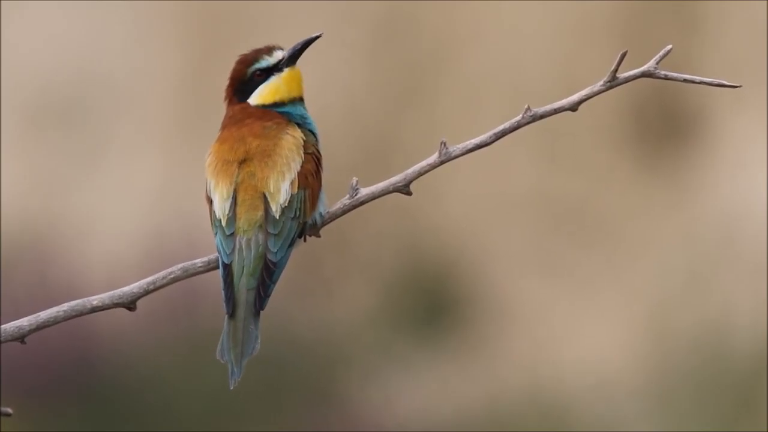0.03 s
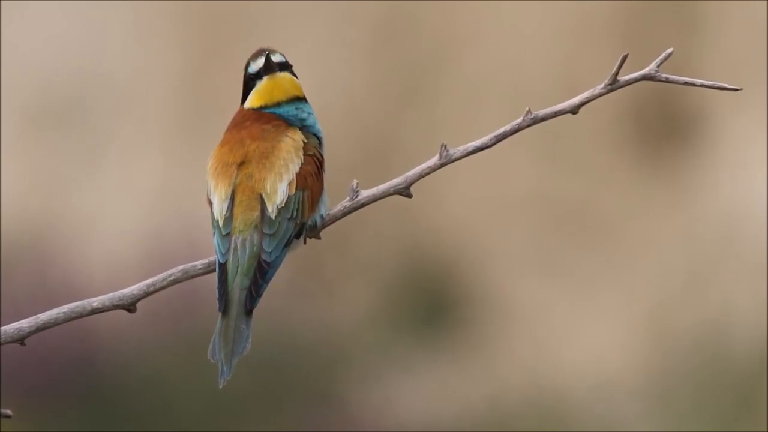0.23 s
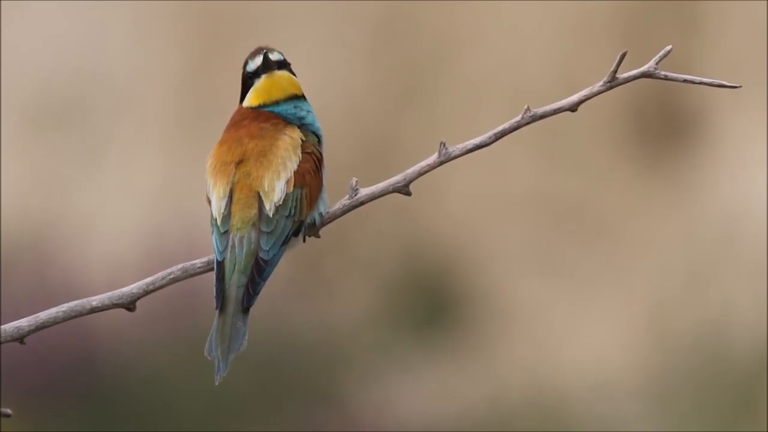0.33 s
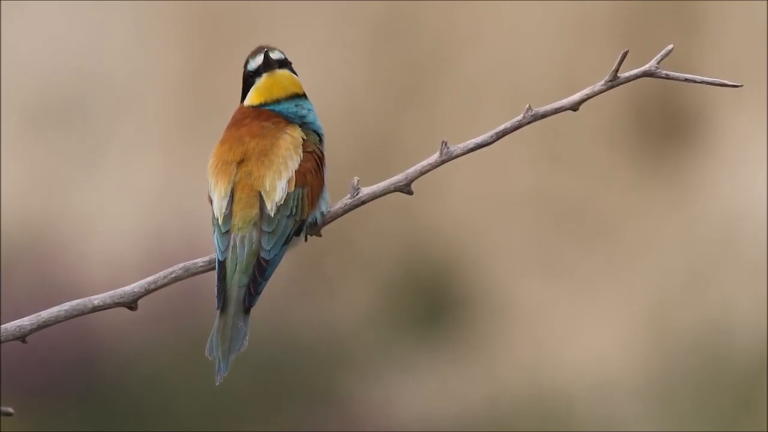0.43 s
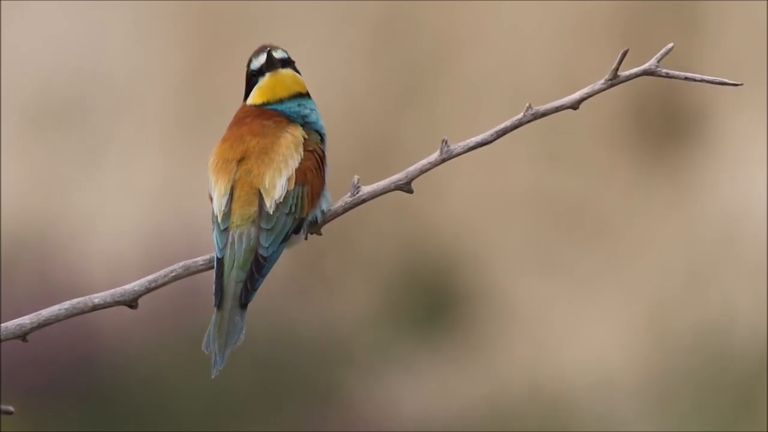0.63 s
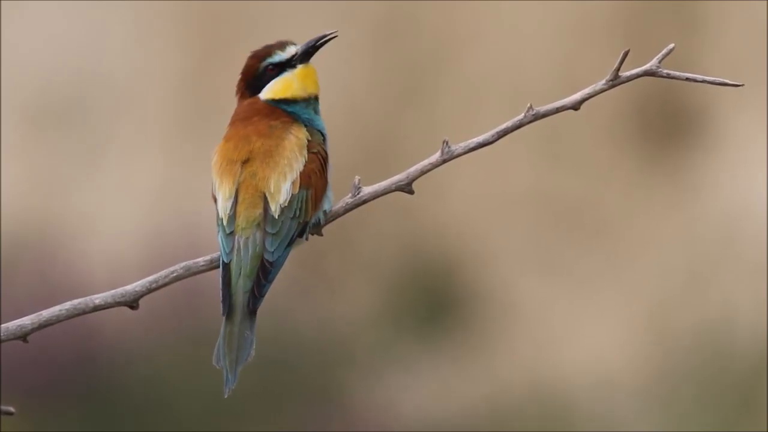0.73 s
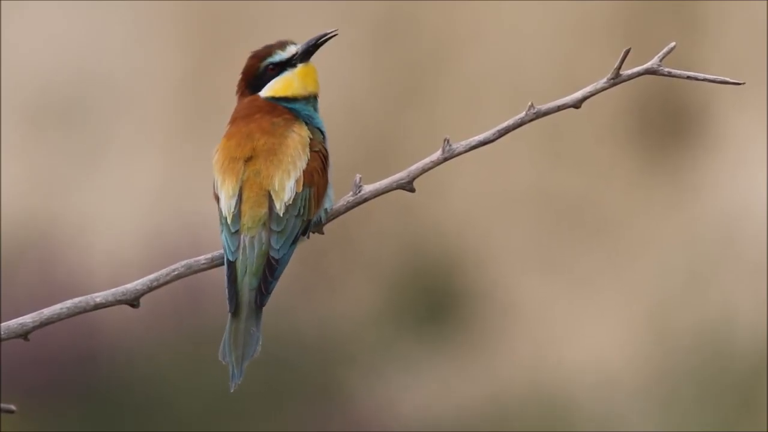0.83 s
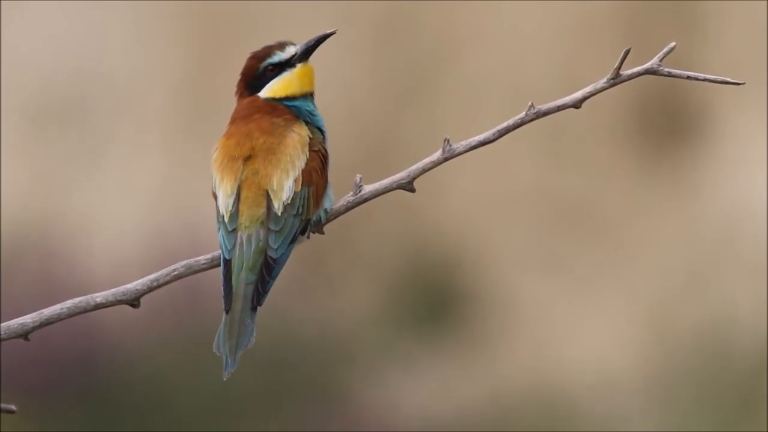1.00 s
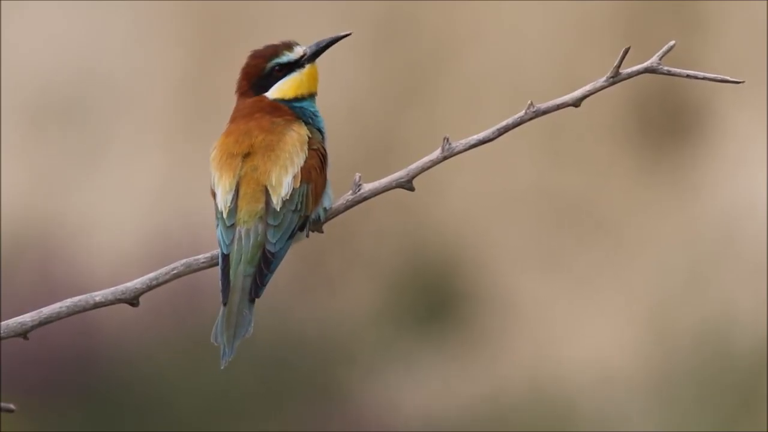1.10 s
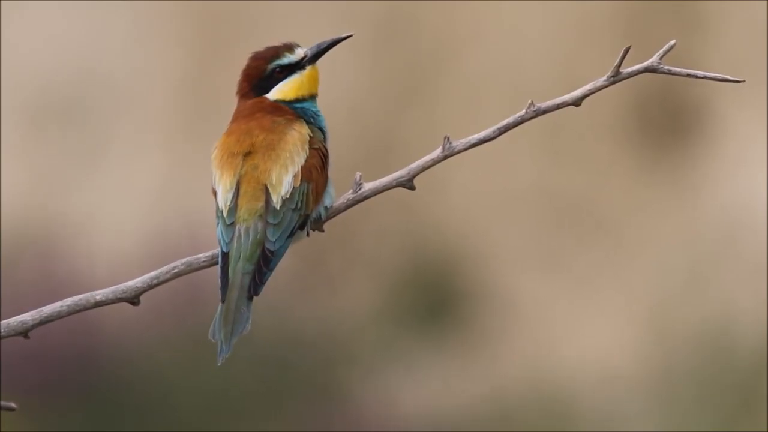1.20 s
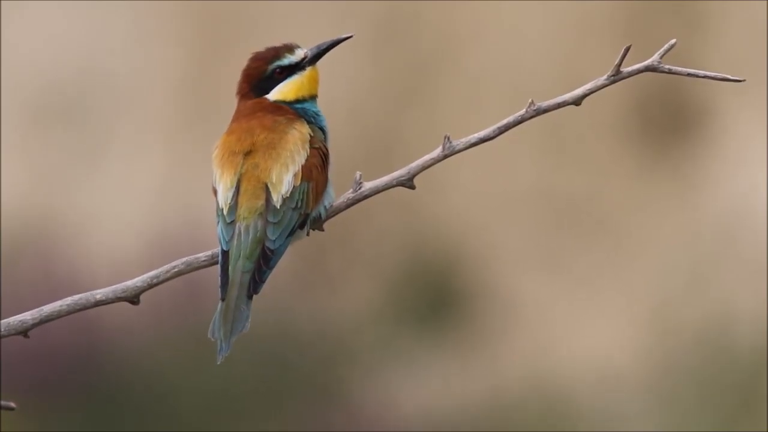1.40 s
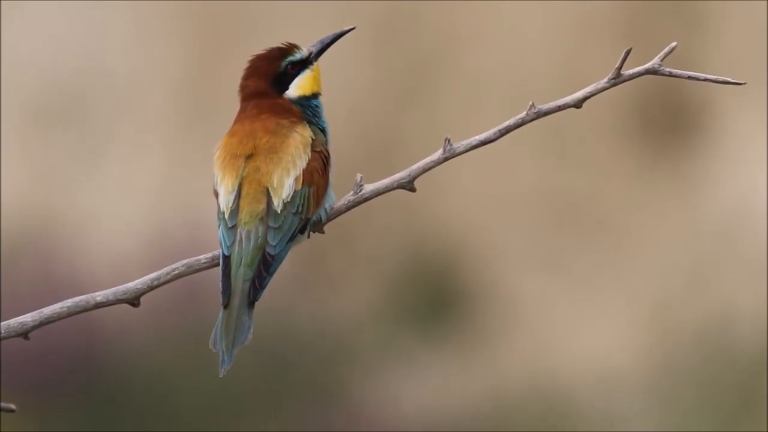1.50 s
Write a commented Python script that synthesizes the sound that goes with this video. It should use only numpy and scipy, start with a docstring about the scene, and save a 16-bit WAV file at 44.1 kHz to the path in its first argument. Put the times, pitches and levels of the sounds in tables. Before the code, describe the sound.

Outdoors, a bird close to the microphone whistles one long rising and falling note. Distant birds chirp and twitter around it, then come soft wing flaps and a faint hoarse falling call, above a low distant drone.

```python
"""One long whistle in open air

Outdoors, the bird nearest the microphone gives a clear whistle, an almost pure tone that climbs
an octave, frays at the top and sinks back. Farther off, with more echo from ground and bushes,
others yelp, twitter and chirp in short bending tones, and one gives a hoarse falling hiss.
A few soft flaps and faint ticks pass over a low distant drone and the hush of open air."""
import sys
import numpy as np
from scipy import signal
from scipy.fft import rfft, irfft, next_fast_len
from scipy.io import wavfile
from scipy.ndimage import uniform_filter1d, map_coordinates

SR = 44100
rng = np.random.default_rng(int(sys.argv[2]) if len(sys.argv) > 2 else 0)


def file_out(sig):
    """Save sig as 16-bit WAV at sys.argv[1]."""
    # one column per channel
    cols = np.atleast_2d(sig).T
    # limit, then scale
    lim = np.clip(cols, -1, 1)
    pcm = np.round(lim * 32767).astype(np.int16)
    wavfile.write(sys.argv[1], SR, pcm)


N = 68355

# colour of the open air: frequency_hz, gain_db
AIR_COLOUR = [(25, -22.5), (60, -4.5), (150, -6.5), (250, 5.5), (420, 9.5), (520, 2), (700, 3), (1200, 1),
              (1700, -5), (3300, 1), (4200, -7), (4900, -26), (8000, -50), (15500, -30)]
# its rise and fall: time_s, level_db
AIR_LEVEL = [(0, -48.5), (.15, -50.5), (.35, -51), (.53, -48), (.65, -49), (.85, -45), (1.02, -48.5),
             (1.25, -50.5), (1.55, -49.5)]
# colour of the thin hiss above it: frequency_hz, gain_db
HISS_COLOUR = [(1500, -50), (4500, 8), (5200, -2), (6500, 2.5), (8000, -1), (10000, -5), (12000, -7),
               (15500, -11.5)]
# its rise and fall: time_s, level_db
HISS_LEVEL = [(0, -58.5), (.15, -62), (.3, -58), (.44, -57), (.56, -57), (.7, -61), (1.05, -59.5),
              (1.35, -59), (1.55, -63)]
# bands of the distant drone: pitch_hz, nominal_width_hz, level_db
DRONE_BANDS = [(377.2, 42, -49), (596, 56, -59), (781, 40, -63), (1088, 100, -59)]
# their shared swell: time_s, gain_db
DRONE_SWELL = [(0, 3.5), (.1, -1.5), (.25, 2.5), (.45, 2), (.65, 0), (.76, 4), (.86, -6.5), (1.02, -0.5),
               (1.2, -1.5), (1.3, -11.5), (1.46, 2.5), (1.55, -2.5)]
# a far bird's yelps, one curve each: time_s, pitch_hz, level_db
YELP_CURVES = [
    [(0, 2140, -37), (.012, 2048, -44), (.026, 1884, -43.5), (.051, 1852, -43.5), (.06, 1400, -51),
     (.069, 1210, -66)],
    [(.82, 1350, -61), (.832, 1688, -43), (.842, 1985, -49), (.867, 2048, -38.5), (.885, 1859, -52),
     (.905, 1998, -40.5), (.927, 2214, -29.5), (.94, 2165, -29.5), (.955, 2001, -44.5), (.972, 1837, -41),
     (.983, 1512, -50), (.995, 1140, -50)],
]
# their overtones: multiple, gain_db
YELP_HARMONICS = [(2, -15.5), (3, -26), (4, -37), (6, -33)]
# overtone lift, one per yelp: gain_db
YELP_BRIGHTNESS = [4.5, -2.5]
# far runs of twittering: start_s, length_s, pitch_hz, level_db, scatter_fraction
TWITTER_RUNS = [(.005, .18, 4820, -55, 0.037), (0.379, .1, 4950, -48.5, .05),
                (1.112, .16, 4966, -49, 0.029), (1.299, .16, 4760, -57, .045)]
# the near bird's whistle: time_s, pitch_hz
WHISTLE_PITCH = [(.18, 2506), (.218, 2480), (.238, 2539), (.256, 2690), (.275, 2800), (.288, 3035),
                 (.3, 3108), (.338, 3263), (.39, 3467), (.412, 3676), (.434, 3746), (.466, 3847),
                 (.498, 4200), (.524, 4520), (.535, 5080), (.554, 5346), (.568, 5330), (.576, 5190),
                 (.583, 5404), (.616, 5214), (.65, 5060), (.708, 4420), (.748, 4210), (.778, 3954),
                 (.836, 3796), (.86, 3690), (.896, 3400), (.96, 3016), (.988, 2802), (1.01, 2680)]
# its loudness: time_s, level_db
WHISTLE_LEVEL = [(.178, -70), (.198, -37), (.214, -29), (.235, -29.5), (.251, -36.5), (.28, -23), (.3, -25),
                 (.316, -22.5), (.331, -30), (.343, -31), (.355, -19), (.368, -19.5), (.383, -23.5),
                 (.394, -37.5), (.412, -27.5), (.434, -25.5), (.46, -35.5), (.487, -23.5), (.506, -22.5),
                 (.514, -33), (.523, -25), (.531, -40), (.563, -43), (.575, -50), (.585, -41.5), (.61, -48),
                 (.635, -51), (.68, -46), (.703, -35), (.714, -44), (.748, -31), (.768, -36.5),
                 (.785, -33.5), (.803, -51), (.833, -32), (.86, -31.5), (.876, -33), (.886, -48),
                 (.895, -32.5), (.908, -30.5), (.924, -42), (.95, -32.5), (.975, -35.5), (.99, -34),
                 (1.008, -76)]
# its fading overtones: multiple, start_gain_db, fade_db_per_s
WHISTLE_HARMONICS = [(2, -27, 5), (3, -25.5, 41), (4, -43, 29), (5, -45, 22)]
# how the throat colours those overtones: frequency_hz, gain_db
THROAT_COLOUR = [(4500, -6.5), (5500, 3), (6350, -3), (6850, -8.5), (7300, -4), (7900, -4.5), (9500, 0.5),
                 (10400, 3.5), (11500, -9.5), (15000, -17)]
# far chirps: start_s, length_s, first_hz, middle_hz, last_hz, level_db, roughness (0-1)
CHIRP_CALLS = [(0.192, 0.051, 3400, 3840, 3900, -52, 0.97), (0.317, 0.037, 5070, 5820, 5600, -47, .4),
               (0.426, .05, 3000, 2550, 2300, -60, .5), (0.526, 0.13, 6000, 6210, 6100, -54, 0.25),
               (0.658, 0.1, 1720, 1450, 1266, -60, 0.25), (0.699, 0.082, 3920, 3695, 3640, -42, 0.4),
               (.69, 0.062, 2850, 2430, 2290, -55.5, 0.52), (1.108, 0.088, 7680, 7240, 7060, -54.5, 0.57),
               (1.263, .032, 5400, 6070, 5880, -43.5, .2), (1.28, 0.013, 4430, 3960, 4100, -42, 0.35),
               (1.293, 0.027, 4000, 4400, 4800, -45.5, .4), (1.368, 0.027, 3643, 3300, 3350, -50.5, 0.96),
               (1.415, 0.042, 2850, 3420, 3520, -49.5, 0.61), (1.461, 0.064, 3430, 3116, 2950, -53, 0.72)]
# faint dry ticks: centre_s, level_db
TICK_EVENTS = [(0.808, -56.5), (.819, -52), (.904, -53), (1.045, -50.5), (1.458, -50)]
# their colour: frequency_hz, gain_db
TICK_COLOUR = [(3000, -30), (7000, -4), (9500, -6), (12000, -14), (16000, -23.5)]
# soft flaps: start_s, length_s, level_db
FLAP_EVENTS = [(1.069, 0.031, -40), (1.115, 0.027, -41.5), (1.157, 0.019, -58), (1.161, 0.035, -48),
               (1.208, .022, -44), (1.514, 0.036, -44)]
# their colour: frequency_hz, gain_db
FLAP_COLOUR = [(100, -22), (400, -15), (620, 4.5), (850, -3), (1100, 3.5), (1400, -8), (2000, -12.5),
               (2700, -9), (5000, -35), (15000, -37)]
# a far bird's hoarse call: time_s, centre_hz, level_db
HOARSE_CURVE = [(1.1, 7730, -77), (1.14, 7200, -67), (1.23, 6400, -60), (1.28, 5600, -53),
                (1.34, 5017, -50.5), (1.39, 4164, -51.5), (1.45, 3760, -57), (1.5, 3290, -76),
                (1.55, 3000, -58)]

TIME_S = np.arange(N) / SR


def amp(db):
    """Decibels to gain."""
    return 10 ** (np.asarray(db) / 20)


def unit(x):
    """Scale to rms 1."""
    return x / np.sqrt(np.mean(x ** 2) + 1e-20)


def colour_db(colour, hz):
    """A colour's gain at hz, on a log frequency axis."""
    frequencies, gains = np.transpose(colour)
    return np.interp(np.log(hz + 1), np.log(frequencies + 1), gains)


def curves(rows):
    """A smoothed value per sample for each column after the time."""
    times, *columns = np.transpose(rows)
    return [uniform_filter1d(np.interp(TIME_S, times, column), size=160) for column in columns]


def during(rows):
    """A soft gate over the span of a curve."""
    sounding = (TIME_S >= rows[0][0] - .002) & (TIME_S <= rows[-1][0])
    return uniform_filter1d(1. * sounding, size=120)


def arch(start_s, length_s):
    """A rounded swell and the progress through it, 0 to 1."""
    progress = np.clip((TIME_S - start_s) / length_s, 0, 1)
    return np.sin(np.pi * progress), progress


def wobble(rate_hz):
    """A smooth random curve, rate_hz knots a second."""
    return map_coordinates(rng.standard_normal(8192), [TIME_S * rate_hz + 4], mode="wrap")


def filtered(x, response):
    """Shape x by a gain that depends on frequency."""
    size = next_fast_len(N + SR // 4)
    return irfft(rfft(x, size) * response(np.fft.rfftfreq(size, 1 / SR)), size)[:N]


def noise(colour):
    """Coloured noise of rms 1."""
    return unit(filtered(rng.standard_normal(N), lambda hz: amp(colour_db(colour, hz))))


def tone(hz):
    """A sine of rms 1 that follows a pitch."""
    return np.sqrt(2) * np.sin(2 * np.pi * np.cumsum(hz) / SR)


def band(hz, width_hz):
    """A noise band of rms 1 around a pitch that may move."""
    phase = 2 * np.pi * np.cumsum(hz * np.ones(N)) / SR
    return unit(wobble(width_hz) * np.sin(phase) + wobble(width_hz) * np.cos(phase))


def distant_drone():
    """Low, narrow bands of noise that swell and waver together."""
    (swell_db,) = curves(DRONE_SWELL)
    drone = sum(amp(db) * band(hz, 1.5 * width) for hz, width, db in DRONE_BANDS)
    return drone * amp(swell_db + 1.9 * wobble(25))


def open_air():
    """The hush of the place: broad noise under a thin hiss, both flickering slightly."""
    (hush_db,), (hiss_db,) = curves(AIR_LEVEL), curves(HISS_LEVEL)
    hush = amp(hush_db + 1.72 * wobble(34.31)) * noise(AIR_COLOUR)
    hiss = amp(hiss_db + wobble(40.6)) * noise(HISS_COLOUR)
    return hush + hiss


def effort(db, mean_db, follow=0.58):
    """Gain of a bird's overtones and breath, which swing less than its fundamental."""
    return amp(mean_db + follow * (db - mean_db))


def yelps(jitter=0.014, rasp_db=-14.5):
    """Far yelps: unsteady tones with overtones and a noisy rasp, dropping away at the end."""
    out = np.zeros(N)
    for call, bright_db in zip(YELP_CURVES, YELP_BRIGHTNESS):
        hz, db = curves(call)
        hz = hz * (1 + jitter * wobble(450))
        overtones = sum(amp(gain_db + bright_db) * tone(k * hz) for k, gain_db in YELP_HARMONICS)
        rasp = amp(rasp_db) * band(hz, width_hz=700)
        voice = amp(db) * tone(hz) + effort(db, mean_db=-48) * (overtones + rasp)
        out += during(call) * amp(2.1 * wobble(150)) * voice
    return out


def twitter(pips_per_s=61, pip_s=0.013, fall=0.056):
    """Far runs of quick, scratchy pips, each a falling tone, uneven in time, pitch and level."""
    out, scratch = np.zeros(N), wobble(1500)
    for start_s, length_s, hz, db, scatter in TWITTER_RUNS:
        for k, (late, sharp, loud) in enumerate(rng.standard_normal((16, 3))):
            if k / pips_per_s < length_s:
                swell, progress = arch(start_s + (k + 0.19 * late) / pips_per_s, pip_s)
                bend = 1 + 0.022 * sharp + scatter * scratch + fall * (.5 - progress)
                out += amp(db + 2 * loud) * swell * tone(hz * bend)
    return out


def whistle(strain_hz=4470, jitter=0.0015, shimmer_db=0.58, breath_db=-31.5):
    """The near bird: an almost pure tone with weak overtones, fraying where the pitch is highest."""
    (hz,), (db,) = curves(WHISTLE_PITCH), curves(WHISTLE_LEVEL)
    strain = (1 + np.tanh((hz - strain_hz) / 390)) / 2
    roughness = 1 + 4.6 * strain  # multiplies jitter, shimmer and breath
    hz = hz * (1 + jitter * roughness * wobble(300))
    age_s = TIME_S - WHISTLE_PITCH[0][0]
    overtones = np.zeros(N)
    for k, start_db, fade_db_per_s in WHISTLE_HARMONICS:
        gain_db = start_db - fade_db_per_s * age_s + colour_db(THROAT_COLOUR, k * hz)
        overtones += amp(gain_db + 2.5 * wobble(60.7)) * tone(k * hz)
    breath = amp(breath_db) * roughness * band(hz, width_hz=520)
    fundamental = amp(db + shimmer_db * roughness * wobble(168.1)) * tone(hz)
    return during(WHISTLE_LEVEL) * (fundamental + effort(db, mean_db=-29) * (overtones + breath))


def chirps(flutter_db=4.5, scatter=.04):
    """Far short calls, each a tone bending through three pitches under one swell."""
    out = np.zeros(N)
    for start_s, length_s, *pitches_hz, db, roughness in CHIRP_CALLS:
        swell, progress = arch(start_s, length_s)
        hz = np.polyval(np.polyfit([0, .5, 1], pitches_hz, 2), progress)
        gain = amp(db + flutter_db * roughness * wobble(300))
        out += gain * swell * tone(hz * (1 + scatter * roughness * wobble(900)))
    return out


def ticks(length_s=0.0032):
    """Tiny dry clicks of bright noise."""
    envelope = sum(amp(db) * arch(centre_s - length_s / 2, length_s)[0] for centre_s, db in TICK_EVENTS)
    return noise(TICK_COLOUR) * envelope


def flaps():
    """Dull puffs of air, as from wings."""
    envelope = sum(amp(db) * arch(start_s, length_s)[0] for start_s, length_s, db in FLAP_EVENTS)
    return noise(FLAP_COLOUR) * envelope


def hoarse_call(width_hz=2200, halo_db=-4):
    """A far bird's fluttering hiss that slides down, with a wider halo of noise around it."""
    hz, db = curves(HOARSE_CURVE)
    hiss = band(hz, width_hz) + amp(halo_db) * band(hz, 2 * width_hz)
    return during(HOARSE_CURVE) * amp(db + 2.3 * wobble(99)) * hiss


def echo(x, t60_s=0.19, delay_s=.003):
    """A thin, short answer from ground and bushes."""
    t = np.arange(SR // 2) / SR
    tail = rng.standard_normal(len(t)) * amp(-60 * t / t60_s) * (t > delay_s)
    return signal.fftconvolve(x, tail / np.linalg.norm(tail))[:N]


def scene():
    """What reaches one microphone in the open; the far birds carry more echo."""
    near = whistle()
    far = yelps() + chirps() + hoarse_call() + twitter()
    answer = echo(amp(-16) * near + amp(-9) * far)
    return (near + far + answer + flaps() + ticks() + distant_drone() + open_air())[None]


def record(dry):
    """The recorder keeps nothing above its band limit."""
    top_hz = 15850
    return filtered(dry[0], lambda hz: hz < top_hz)[None]


dry = scene()
out = record(dry)
file_out(out)
```